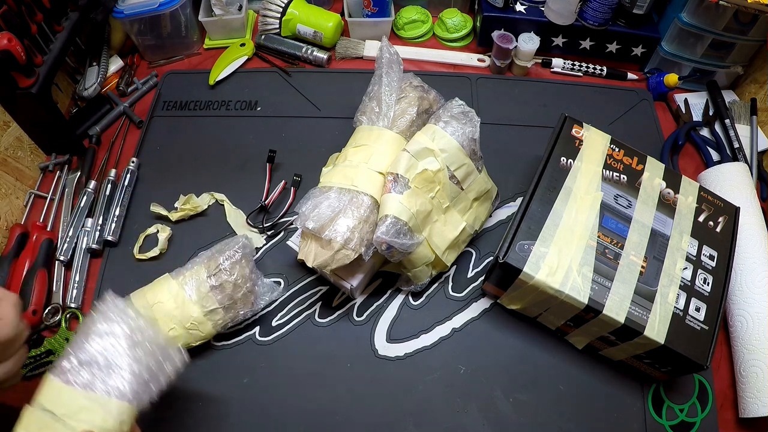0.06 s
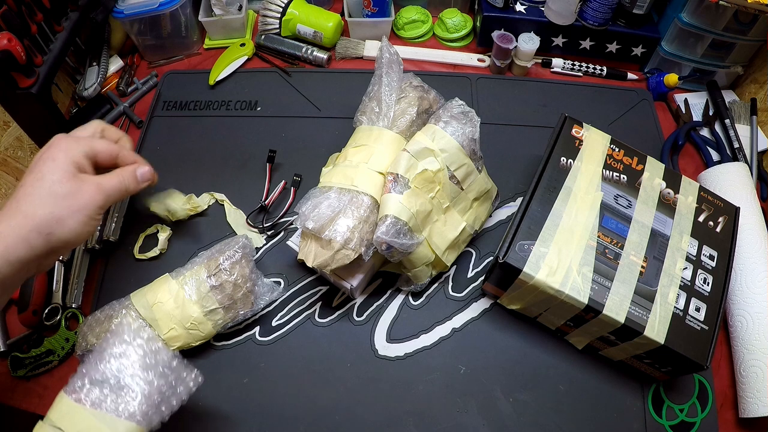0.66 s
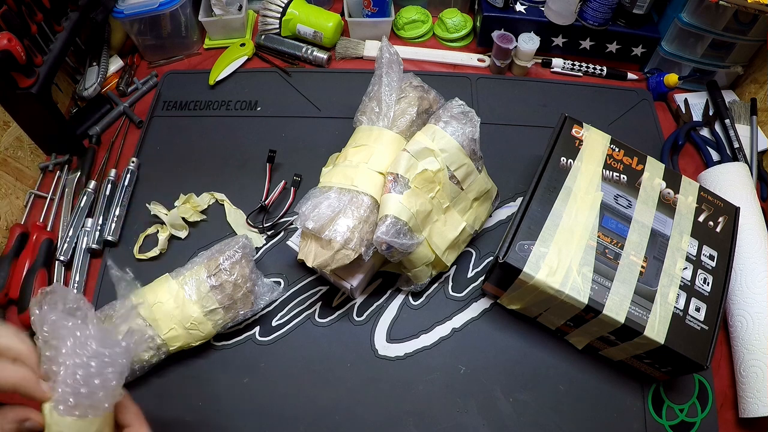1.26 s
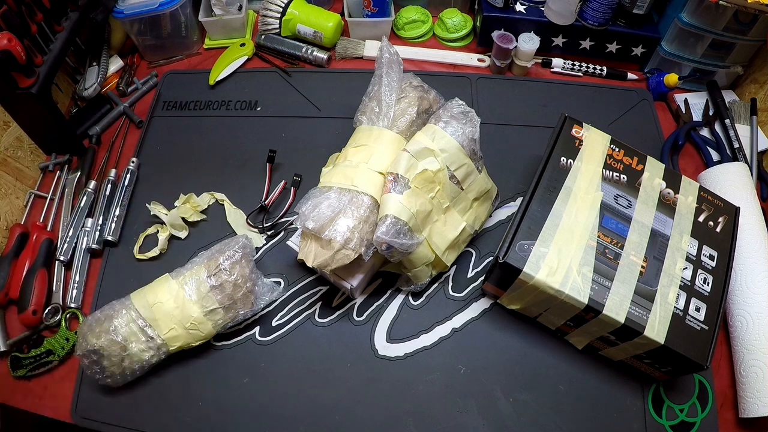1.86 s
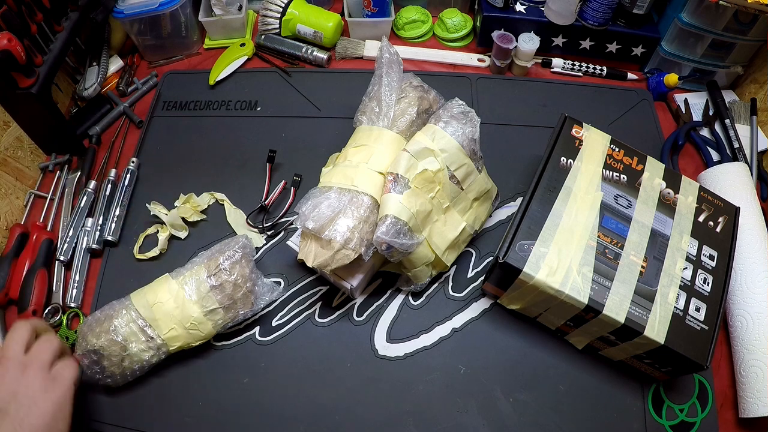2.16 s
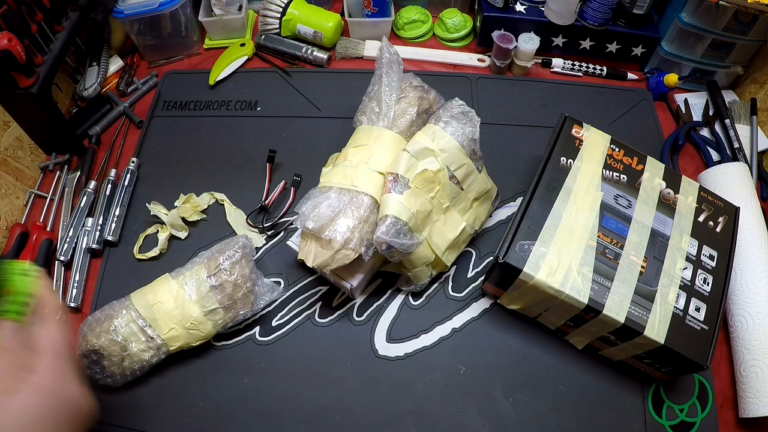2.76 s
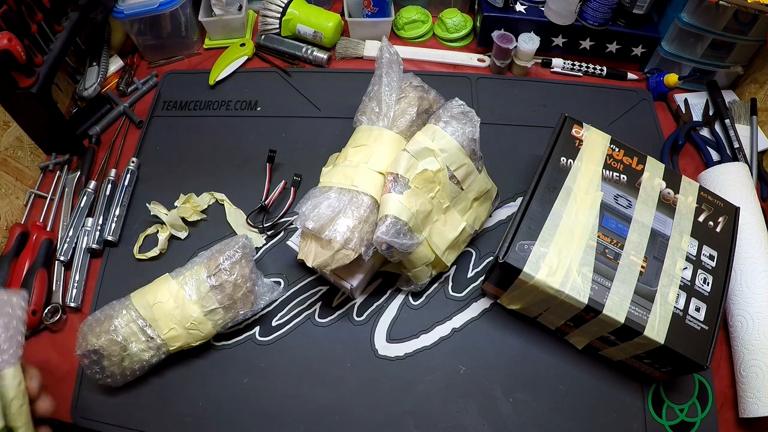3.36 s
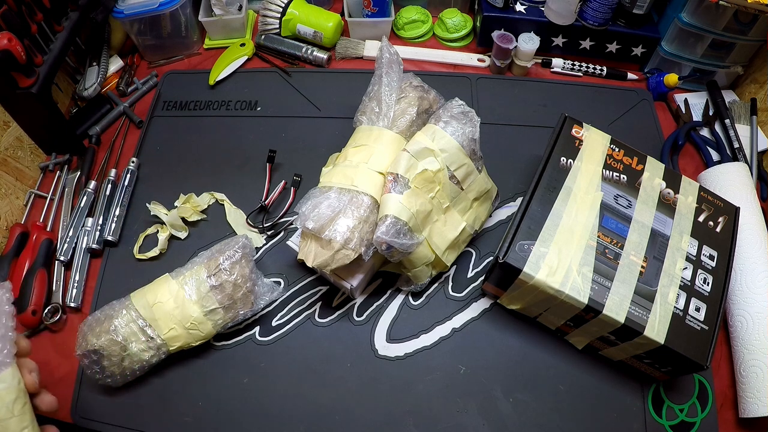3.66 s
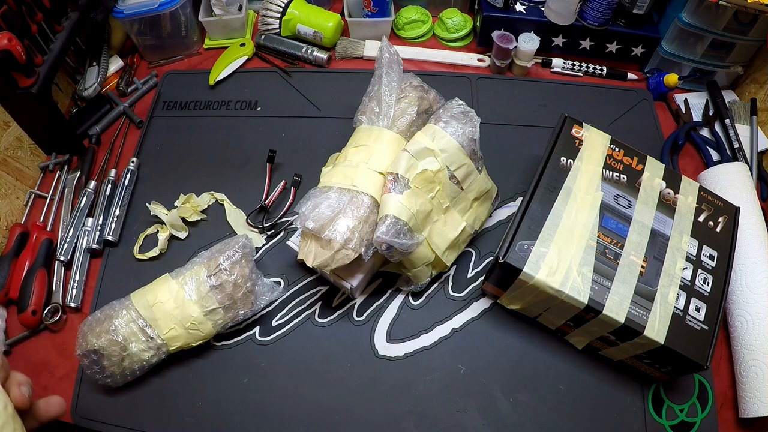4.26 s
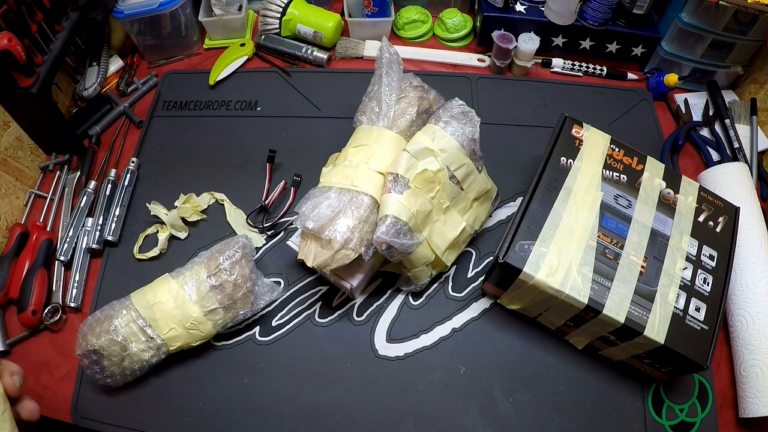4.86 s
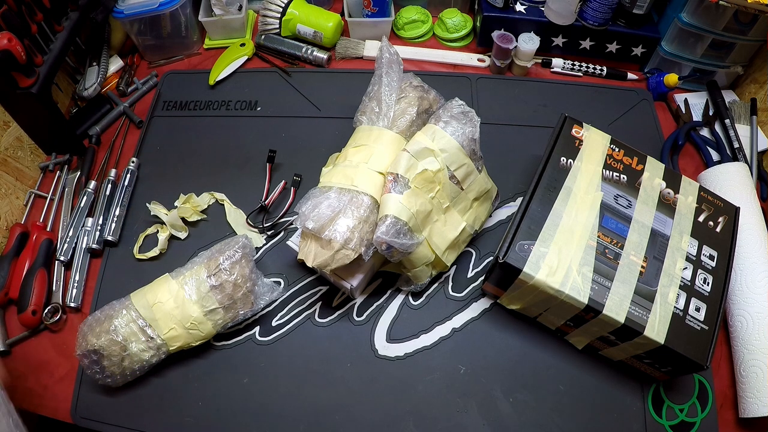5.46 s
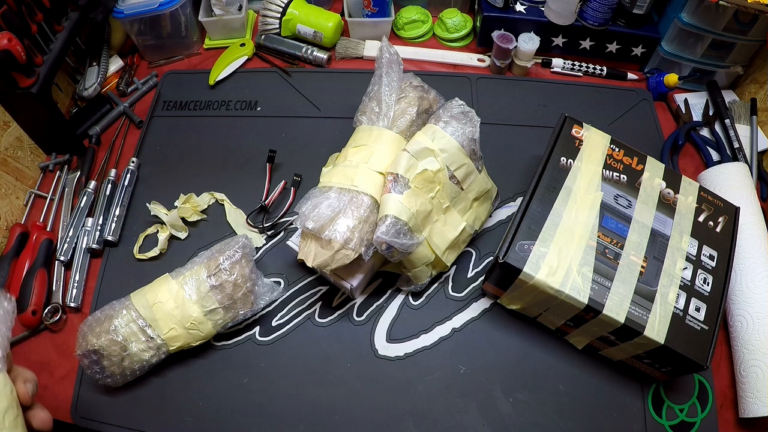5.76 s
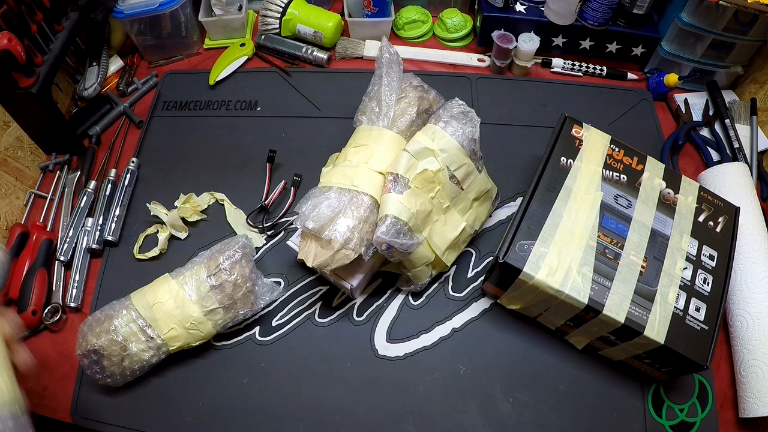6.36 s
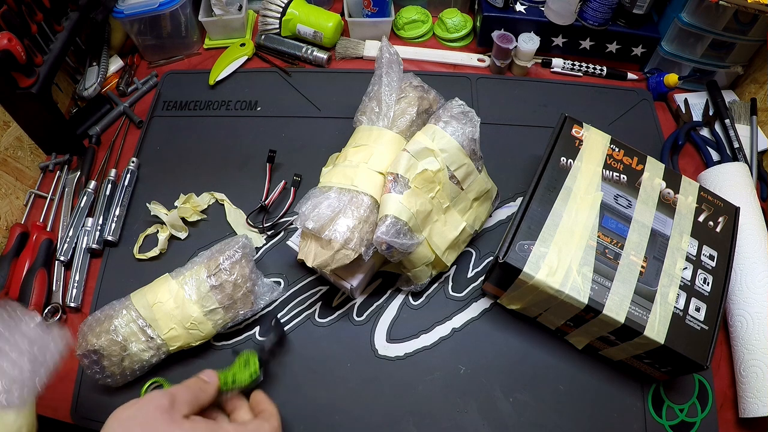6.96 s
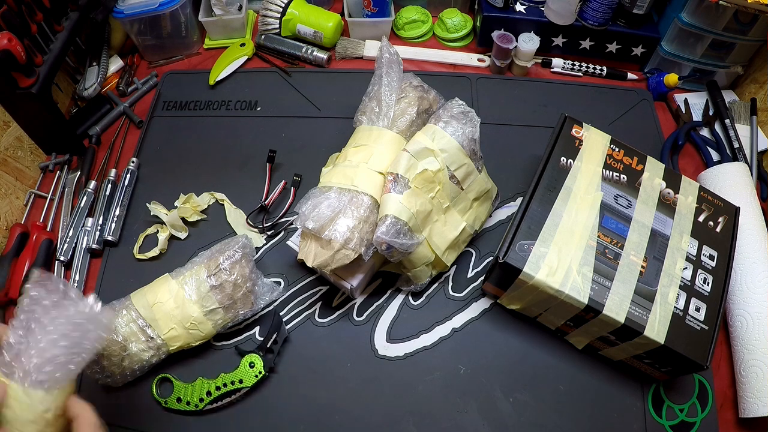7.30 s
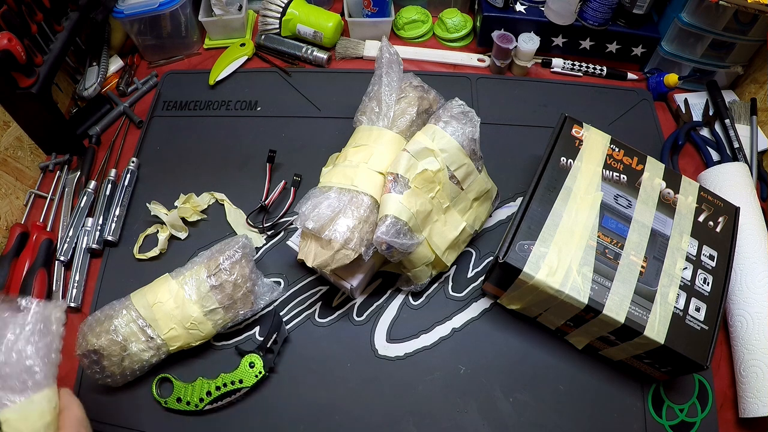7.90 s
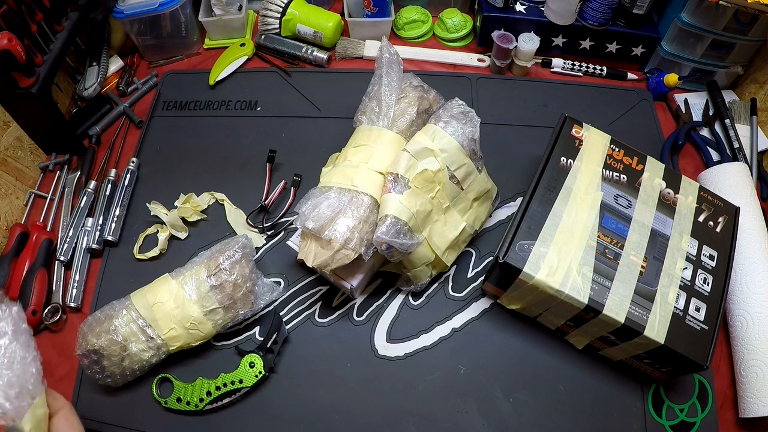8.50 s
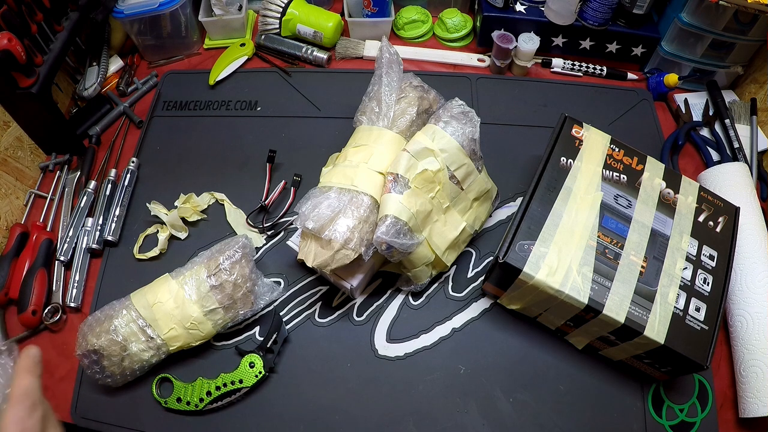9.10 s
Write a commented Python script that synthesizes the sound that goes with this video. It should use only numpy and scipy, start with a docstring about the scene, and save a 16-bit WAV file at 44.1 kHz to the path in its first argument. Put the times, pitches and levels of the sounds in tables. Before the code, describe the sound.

Close crinkling of a taped plastic parcel, with a knife's ringing click, short cutting rasps, bubble pops and soft bumps on a workbench.

```python
"""Cutting open a bubble-wrapped parcel

A taped parcel is handled at a workbench, close to a small camera. The wrap crinkles as fingers squeeze
it. A folding knife is picked up and flicked open with a ringing click, rasps through the tape and bursts
bubbles, then is laid on the mat. The bench and the camera's housing ring along, the room adds a
short echo, and the camera's electronics tick faintly over a low rumble."""
import sys
import numpy as np
from scipy import signal
from scipy.fft import rfft, irfft
from scipy.io import wavfile

SR = 44100
rng = np.random.default_rng(int(sys.argv[2]) if len(sys.argv) > 2 else 0)


def wrap_up_sound(samples):
    """Save the sound to the file named by the first command line argument, as 16-bit audio."""
    columns = np.atleast_2d(samples).T
    # keep every value between -1 and 1, then stretch to whole-number steps
    tamed = np.clip(columns, -1, 1)
    steps = np.round(tamed * 32767).astype(np.int16)
    wavfile.write(sys.argv[1], SR, steps)


N = 407484
T = np.arange(N) / SR
TAPS = 4096  # filter length in samples
HZ = np.fft.rfftfreq(TAPS, 1 / SR) + 1  # the frequencies at which a filter's gain is set

# The tone of each source. Each row: frequency in Hz, relative level in dB.
RUMBLE_TONE = [(8, -7), (25, 3.5), (33, -4), (46, 3.5), (75, -9.5), (130, -20.5), (250, -24), (500, -30),
               (1000, -35.5), (3000, -44.5), (8000, -51), (15500, -61)]
MAT_TONE = [(40, -6), (150, 10), (350, -13), (700, -18.5), (1500, -29), (8000, -58.5)]
STEEL_TONE = [(150, -37.5), (1200, -25), (1900, -6.5), (5000, -5.5), (6400, 11), (7500, -1), (12000, -0.5),
              (15500, -8.5)]
SNAP_TONE = [(100, -6.5), (500, -12), (1200, -1), (2500, 3), (5000, 1.5), (9000, -5), (15500, -15.5)]
POP_TONE = [(40, -21), (150, -1), (500, -9), (900, -1), (1500, -1.5), (2600, 0), (5000, -6.5), (9000, -17),
            (15500, -28)]
CRUNCH_TONE = [(100, -17.5), (300, -7.5), (550, -5), (760, -2.5), (1000, -7), (1400, -2), (2200, -2),
               (4000, -7.5), (12000, -33)]
CRINKLE_TONE = [(300, -34), (900, -18), (1800, -10), (3000, -1), (5000, -.5), (7500, -4.5), (11000, -9.5),
                (15500, -14)]
# The notes a struck thing rings with. Each row: pitch in Hz, relative level in dB, seconds to fade 60 dB.
BENCH_NOTES = [(47.7, -10, 0.28), (88.8, -2.5, 0.11), (116.5, 9, 0.12), (160, -15.5, 0.07),
               (284, -21, 0.17)]
HANDLE_NOTES = [(279.4, -8, 0.15), (421.8, -9, .17), (504, -5, 0.076), (626, -2, .12), (758, 1.5, 0.075),
                (1027, -10, .2), (1524, -13, 0.26), (2165, -9, 0.206), (2740, -16, 0.16)]
KNIFE_NOTES = [(2150, -4.5, 0.13), (2502, -22, .06), (2870, -7.5, .06), (4250, -0.5, 0.12), (6780, -2, .14),
               (6930, 4.5, 0.1), (6880, -7, .09), (8260, -8, 0.081), (11000, -24, .14), (11700, -15, .08),
               (13600, -12.5, 0.094)]
# Close-up colouring: a microphone dip near 200 Hz, the bench ringing near 290 Hz, and the camera's
# housing ringing above that. Each row: frequency in Hz, width in Hz (widened to 65 if narrower),
# boost or cut in dB.
CLOSE_UP_COLOUR = [(204.4, 50, -12), (288.5, 94, 7.5), (405, 23, 4), (530, 40, 2.5), (799, 270, 6.5),
                   (982, 55, 9), (1297, 70, 5.5), (1413, 160, 5), (1700, 104, 7), (2235, 130, 7.5),
                   (2558, 170, 3.5), (2910, 80, 4), (3737, 390, 2), (4620, 500, 1.5)]
# How long the workshop echoes. Each row: frequency in Hz, seconds to fade 60 dB.
ROOM_FADE = [(100, 0.5), (500, 0.27), (2000, 0.23), (6000, 0.19), (14000, 0.15)]

# Hand, parcel and knife bump the mat. Each row: start in seconds, level in dB.
MAT_THUMPS = [(2.164, -35), (2.357, -40), (2.425, -36), (2.52, -34), (6.715, -41.5), (7.018, -34),
              (7.065, -31), (7.176, -30), (7.225, -41)]
# The knife's handle knocks on tools when picked up, and on the mat when laid down.
# Each row: start in seconds, level in dB, tilt toward the treble in dB per octave.
HANDLE_KNOCKS = [(2.357, -51, 0), (2.424, -35.5, -1.5), (2.513, -41.5, -1.5), (7.086, -41, -8),
                 (7.176, -44, -15)]
# The blade swings out and locks. Each row: start in seconds, relative level in dB.
LOCK_CLICKS = [(2.9255, -35.5), (2.9326, -19.5), (2.935, -8.5), (2.9376, -12), (2.941, -25.5)]
# Blade and hands scrape over tape, film and mat.
# Each row: start in seconds, length in seconds, level in dB, centre in Hz, width in octaves.
SCRAPE_STROKES = [(1.068, 0.042, -42, 1420, 0.175), (2.341, 0.39, -44.5, 200, 1.29),
                  (2.414, .09, -39, 560, 0.53), (2.503, 0.064, -43, 566, .55),
                  (4.348, 0.053, -21, 1800, 1.7), (4.396, 0.087, -20.5, 1527, 1.56),
                  (5.13, .11, -25, 2140, 0.54), (5.136, 0.18, -36, 2000, 0.29),
                  (5.124, 0.13, -33.5, 640, 0.8), (5.288, 0.24, -32.5, 1450, 1.36),
                  (5.404, 0.08, -21.5, 2080, 1.8), (6.124, 0.2, -37, 1700, 1.2),
                  (6.189, 0.096, -21.5, 1660, 1.33), (6.273, 0.077, -25.5, 1700, 1.6),
                  (6.599, 0.63, -49.5, 284.7, 0.16), (8.378, .03, -21, 2357, 0.216),
                  (8.825, 0.1, -34, 1120, 1.26), (8.95, 0.088, -44, 1050, 0.65)]
# Clicks from creasing wrap and from handling the knife. Each row: start in seconds,
# relative level in dB, brightness (higher means more treble).
HANDLING_SNAPS = [(0.0158, -34, 6), (0.063, -43.5, 8), (0.3321, -38, 5), (0.702, -41.5, -3),
                  (0.8923, -43, -4.5), (1.0102, -43, -9.5), (1.1304, -35.5, 8), (1.4967, -45, 9),
                  (1.8352, -37.5, -0.5), (2.1708, -35.5, -10.5), (2.415, -33.5, 5.5), (2.424, -36, -3.5),
                  (2.5132, -39.5, -5), (3.211, -39, 4.5), (3.294, -33.5, -4), (3.7113, -35, -12.5),
                  (4.8495, -48, 4.5), (5.0852, -42.5, -12.5), (6.6071, -37, 18), (6.6312, -29.5, 2),
                  (6.834, -41.5, -8), (7.2449, -36, -1.5), (8.2308, -32, -2.5), (8.3793, -19.5, 1),
                  (8.7325, -35.5, 4.5), (8.8867, -40, 1)]
# Bubbles burst and tape gives way. Each row: start in seconds, relative level in dB, brightness,
# bass boost from the push of air in dB.
BUBBLE_POPS = [(4.3584, -14, -13, -18), (4.3647, -13.5, -12, -10), (4.3698, -17.5, -7, -7),
               (4.3856, -9, -16.5, -1), (4.426, -15, -2, 4.5), (5.2822, -30.5, -4.5, -7),
               (5.3124, -29.5, -7, -5), (5.3318, -26, -12, 2), (5.352, -26.5, -5.5, 9),
               (5.3688, -22, -9.5, -1), (5.4127, -22, -9, -3), (5.4382, -15, -8.5, -3),
               (5.4552, -18.5, -4, -2), (6.211, -20, -10, -11.5), (6.2439, -16, -4.5, -8),
               (6.261, -18.5, -3.5, 5.5), (6.3101, -13.5, -8, -4)]
# Faint crinkling while the parcel is only held. Each row: time in seconds, level in dB.
HOLDING_LEVELS = [(0, -63.5), (.97, -63.5), (1.1, -51), (1.9, -51.5), (2.1, -63.5), (2.5, -62), (2.88, -71),
                  (2.95, -51), (3.15, -56), (4.55, -48.5), (4.92, -66.5), (5.1, -63), (5.45, -45.5),
                  (5.82, -65), (6.4, -51), (7.15, -53.5), (7.35, -52.5), (9.24, -44)]
# Fingers squeeze the wrap. Each row: start in seconds, seconds until they let go, crinkle level in dB,
# level of the dull crunch in dB compared with the crinkle.
FINGER_SQUEEZES = [(0.0, 0.0086, -35, -17), (0.148, 0.052, -43.5, -14), (.26, 0.029, -57, -16),
                   (.314, 0.024, -34, -19), (.385, 0.015, -44.5, -24.5), (.447, 0.055, -47, -18),
                   (.7, 0.12, -60, 0.5), (.89, 0.062, -54, -5), (1.008, 0.0186, -44.5, -0.5),
                   (1.06, 0.12, -43.5, -4), (1.18, 0.0937, -44.5, -3.5), (1.31, 0.044, -52, -2),
                   (1.419, 0.0846, -41.5, -8.5), (1.571, 0.0836, -41, -4.5), (1.735, .05, -43, 0.5),
                   (1.79, 0.053, -47, -5), (1.915, 0.029, -45.5, -4), (2.15, 0.023, -56, -3),
                   (2.915, 0.032, -45.5, -1), (3.08, 0.0283, -50, -5), (3.195, 0.027, -49.5, -2.5),
                   (3.285, 0.1097, -41.5, -6), (3.44, 0.027, -45.5, -13.5), (3.539, 0.098, -44.5, -1.5),
                   (3.69, .18, -46, -5.5), (3.9, .21, -43.5, -10), (4.16, 0.05, -46.5, -14),
                   (4.29, 0.066, -47, -5), (4.759, 0.014, -51.5, -18.5), (5.01, 0.049, -56.5, 2),
                   (5.22, .05, -46, 1), (5.275, .19, -40, -2), (5.56, 0.038, -44.5, -2),
                   (5.914, 0.02, -49.5, 4.5), (5.974, 0.0275, -51, 6.5), (6.085, 0.037, -53, 3),
                   (6.135, 0.044, -42.5, -9), (6.18, .14, -35, -12), (6.42, 0.03, -45, -4),
                   (6.478, 0.0196, -33, -6), (6.54, 0.0314, -52, -1), (6.63, .08, -49.5, -10),
                   (6.82, 0.033, -49.5, 4.5), (6.93, 0.0471, -45.5, 3), (7.08, 0.054, -46, -15),
                   (7.269, .17, -45, -3.5), (7.44, .065, -36.5, -6.5), (7.53, 0.16, -37.5, -9),
                   (7.78, .04, -47, 2.5), (7.832, 0.037, -35, -3.5), (7.885, .07, -40, -8),
                   (7.97, .23, -46.5, -1), (8.22, 0.157, -39.5, -7.5), (8.385, 0.11, -32.5, -10),
                   (8.5, 0.073, -37.5, -6.5), (8.674, 0.073, -35.5, -3.5), (8.79, 0.11, -40, -4.5),
                   (8.949, 0.0248, -42, 1.5), (9.04, 0.05, -37.5, -14.5), (9.16, 0.049, -32.5, -8)]


def amp(db):
    """Turn decibels into a number to multiply a sound by."""
    return 10 ** (np.asarray(db) / 20)


def normalised(x, size=None):
    """Scale a sound so that its first size samples (all, by default) have an average power of 1."""
    return x / np.sqrt(np.mean(x[:size] ** 2) + 1e-20)


def curve(points, hz=HZ):
    """Join (Hz, value) points with lines, giving every octave the same space."""
    point_hz, value = np.transpose(points)
    return np.interp(np.log(hz + 1), np.log(point_hz), value)


def add(mix, start, sound):
    """Mix a sound in at start seconds."""
    part = mix[round(start * SR):][:len(sound)]
    part += sound[:len(part)]


def filtered(x, db):
    """Turn each frequency in HZ up or down by its value in db."""
    cepstrum = irfft(np.log(amp(np.maximum(db, db.max() - 100))))
    # Folding this onto its first half makes the filter ring only after a click, never before.
    cepstrum[1:TAPS // 2] *= 2
    cepstrum[TAPS // 2 + 1:] = 0
    return signal.oaconvolve(x, irfft(np.exp(rfft(cepstrum))))[:len(x)]


def close_up(x, tone_db):
    """Give a sound its own tone, plus the colouring of microphone, bench and camera housing."""
    colour_db = sum(db / (1 + (2 * (HZ - hz) / max(width, 65)) ** 2)
                    for hz, width, db in CLOSE_UP_COLOUR)
    return filtered(x, tone_db + colour_db)


def crack(chatter, decay_s):
    """A jump in air pressure swings over into suction, followed by fast-fading chatter."""
    t = T[:4 * TAPS]
    noise = chatter * rng.standard_normal(len(t)) * np.exp(-t / decay_s)
    jump = signal.lfilter([-.72, 1], [1, -.72], t == 0)
    return noise + signal.lfilter([.45], [1, -.55], jump)


def ringing(notes):
    """A struck thing rings with fading notes, tuned a little differently at every hit."""
    t = T[:4 * TAPS]
    return sum(amp(db - 60 * t / fade_s) * np.sin(2 * np.pi * hz * rng.normal(1, 0.003) * t)
               for hz, db, fade_s in notes)


def random_clicks(per_s, spread_db, size=N):
    """Clicks at random moments; spread_db sets how much their strengths differ."""
    clicks = 1. * (rng.random(size) < per_s / SR)
    at = np.flatnonzero(clicks)
    strength, side = rng.random((len(at), 2)).T
    clicks[at] = amp(spread_db * np.minimum(-np.log(strength), 4)) * np.sign(side - .5)
    return normalised(clicks)


def drift(per_s, db):
    """A volume that wanders at random by about db."""
    times = np.arange(0, T[-1] + 1, 1 / per_s)
    return np.interp(T, times, amp(db * rng.standard_normal(len(times))))


def rumble():
    """A steady, low noise lies under everything."""
    return amp(-44.5) * normalised(filtered(rng.standard_normal(N), curve(RUMBLE_TONE)))


def electronic_ticks(per_s=9.7637, dip_s=0.002):
    """Electrical interference makes a soft, regular blip that dips and slowly swings back."""
    out, age = np.zeros(N), T[:TAPS] / dip_s
    dip = -(age * np.exp(1 - age)) ** 3
    blip = signal.sosfilt(signal.butter(2, 28, "highpass", fs=SR, output="sos"), dip)
    for start in np.arange(.0821, T[-1], 1 / per_s):
        add(out, start, amp(-34.5 + rng.normal(0, 1)) * blip)
    return out


def room(x):
    """Sound bounces off the bench top, then leaves a short tail whose treble fades first."""
    t = T[:SR // 2]
    out = x + 0.15 * np.pad(x, (round(.0025 * SR), 0))[:N]
    for k in range(3):
        hz, age, bands = signal.stft(rng.standard_normal(len(t)), SR, nperseg=256)
        fade = amp(-60 * age / curve(ROOM_FADE, hz)[:, None])
        tail = signal.istft(bands * fade, SR, nperseg=256)[1][:len(t)]
        tail *= np.clip((t - .004) / 0.0024, 0, 1)
        # Three tails take turns, so the echo shifts as it does when hands move.
        share = np.sqrt(2 / 3) * np.cos(2 * np.pi * (7 * T + k / 3))
        out += amp(-15) * signal.oaconvolve(x * share, tail / np.linalg.norm(tail))[:N]
    return out


def bench_thumps():
    """Soft blows pass through the mat into the bench top; harder ones sound deeper."""
    out, octave = np.zeros(N), np.log2(np.clip(HZ, 50, 1000) / 100)
    rocking = [(7.091 + k * 0.025, -18 - k * 6.5) for k in range(3)]  # the laid-down knife rocks to rest
    jolts = [(start, db - 17.5) for start, db, *_ in BUBBLE_POPS]  # each pop jolts the parcel
    for start, db in MAT_THUMPS + rocking + jolts:
        db_per_octave = -.42 * (db + 33)
        pat = normalised(close_up(crack(chatter=0.77, decay_s=0.0114), curve(MAT_TONE)), size=700)
        boom = normalised(ringing(BENCH_NOTES), size=700)
        blow = filtered(boom + amp(-4.5) * pat, db_per_octave * octave)
        add(out, start, amp(db) * normalised(blow, size=700))
    return out


def handle_knocks():
    """The knife's hollow handle clacks; landing on the mat takes the treble out of it."""
    out, octave = np.zeros(N), np.log2(np.clip(HZ, 400, 3000) / 400)
    for start, db, db_per_octave in HANDLE_KNOCKS:
        clack = filtered(ringing(HANDLE_NOTES), db_per_octave * octave)
        add(out, start, amp(db) * normalised(clack, size=700))
    return out


def knife_lock():
    """Steel strikes the lock and chatters; blade and handle ring."""
    out = np.zeros(N)
    for start, db in LOCK_CLICKS:
        click = close_up(crack(chatter=0.17, decay_s=0.0052), curve(STEEL_TONE))
        add(out, start, amp(db + 0.5) * normalised(click, size=170))
        add(out, start, amp(db - 18.5) * normalised(ringing(KNIFE_NOTES), size=170))
    return out


def scrapes():
    """An edge catches and slips thousands of times a second; each stroke peaks early and dies away."""
    out = np.zeros(N)
    for start, length, db, centre_hz, octaves in SCRAPE_STROKES:
        t, peak_s = np.arange(0, length, 1 / SR), 0.19 * length
        off_centre = (np.log2(HZ / centre_hz) / octaves) ** 2
        tone_db = -20 * np.log10(1 + off_centre / 2 + off_centre ** 2 / 8)
        rasp = close_up(random_clicks(per_s=3000, spread_db=0, size=len(t)), tone_db)
        stroke = np.minimum(t / peak_s, 1) * amp(np.interp(t, [peak_s, length], [0, -24.5]))
        add(out, start, amp(db) * stroke * normalised(rasp))
    return out


def handling_snaps():
    """Short, sharp clicks, bright or dull, come from creasing wrap and from handling the knife."""
    out, octave = np.zeros(N), np.log2(np.maximum(HZ, 500) / 2000)
    for start, db, brightness in HANDLING_SNAPS:
        tone_db = curve(SNAP_TONE) + 0.64 * brightness * octave
        snap = close_up(crack(chatter=0.45, decay_s=0.0081), tone_db)
        add(out, start, amp(db + 1.5) * normalised(snap, size=170))
    return out


def bubble_pops():
    """A bubble bursts with a sudden push of air; weak pops have more chatter from the plastic film."""
    out, octave = np.zeros(N), np.log2(np.maximum(HZ, 1000) / 2000)
    for start, db, brightness, push_db in BUBBLE_POPS:
        tilt_db = 0.47 * (brightness + 9) * octave
        bass_db = push_db / (1 + (HZ / 550) ** 4)
        chatter = 0.13 * amp(0.46 * max(-16 - db, 0))
        pop = close_up(crack(chatter, decay_s=.0055), curve(POP_TONE) + tilt_db + bass_db)
        add(out, start, amp(db + 3.5) * normalised(pop, size=170))
    return out


def film_patches(tone, centres_hz, per_s, spread_db, drift_db, chatter_db, decay_s):
    """Each patch of film buckles with its own tone, and comes and goes as the fingers move."""
    out, keep = np.zeros(N), np.exp(-2 / (decay_s * SR))
    for centre_hz in centres_hz:
        clicks = random_clicks(per_s, spread_db) * drift(per_s=30, db=drift_db)
        # Each click leaves the film shaking for a moment.
        shaking = np.sqrt(signal.lfilter([1 - keep], [1, -keep], clicks ** 2 + 1e-12))
        chatter = amp(chatter_db) * shaking * rng.standard_normal(N)
        patch_db = 9 * np.exp(-(np.log2(HZ / centre_hz) / 0.36) ** 2)
        out += close_up(clicks + chatter, curve(tone) + patch_db)
    return normalised(out)


def wrap_crinkle(rise_s=0.017, rise_db_per_s=520.5, fall_db_per_s=419.5):
    """Thin film crinkles over the duller crunch of squeezed bubbles; a squeeze swells, then settles."""
    holding_ratio = amp(-4.5) ** 2  # crunch power over crinkle power between squeezes
    crinkle_power = amp(np.interp(T, *np.transpose(HOLDING_LEVELS))) ** 2
    crunch_power = crinkle_power * holding_ratio
    for start, held, db, crunch_db in FINGER_SQUEEZES:
        first_touch = max(start - .1, 0)
        t = T[:SR] + first_touch - start
        below_peak_db = rise_db_per_s * np.maximum(rise_s - t, 0) + fall_db_per_s * np.maximum(t - held, 0)
        squeeze = amp(db - below_peak_db)
        add(crinkle_power, first_touch, squeeze ** 2)
        add(crunch_power, first_touch, (squeeze * amp(crunch_db)) ** 2)
    crinkle = film_patches(CRINKLE_TONE, np.geomspace(2200, 12000, num=8), per_s=170,
                           spread_db=4.5, drift_db=2.5, chatter_db=5.5, decay_s=0.009)
    crunch = film_patches(CRUNCH_TONE, np.geomspace(1000, 2300, num=4), per_s=240,
                          spread_db=3.5, drift_db=6, chatter_db=-1.5, decay_s=0.0056)
    # Lightly brushed film sounds thin: with little crunch, the crinkle loses some of its lows.
    lows = signal.sosfiltfilt(signal.butter(2, 3592, fs=SR, output="sos"), crinkle)
    thinness = 1 - np.minimum(crunch_power / crinkle_power / holding_ratio, 1) ** 0.14
    return (crinkle - thinness * lows) * np.sqrt(crinkle_power) + crunch * np.sqrt(crunch_power)


def scene():
    """Mix the parcel and the knife, echoing in the room, over the rumble and ticks in one channel."""
    background = rumble()
    unwrapping = wrap_crinkle() + bubble_pops() + handling_snaps() + scrapes()
    knife = knife_lock() + handle_knocks()
    return (background + room(unwrapping + knife + bench_thumps()) + electronic_ticks())[None]


def record(dry):
    """Round off the loudest cracks, then cut the very highest treble."""
    rounded = dry / (1 + (dry / .85) ** 6) ** (1 / 6)
    lowpass = signal.firwin(401, 15500, window=("kaiser", 8), fs=SR)
    return signal.oaconvolve(rounded, lowpass[None], "same")


dry = scene()
out = record(dry)
wrap_up_sound(out)
```